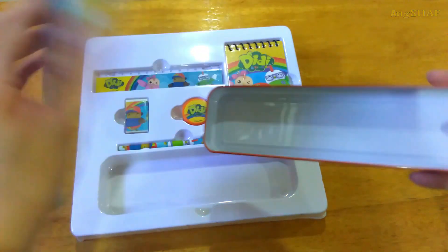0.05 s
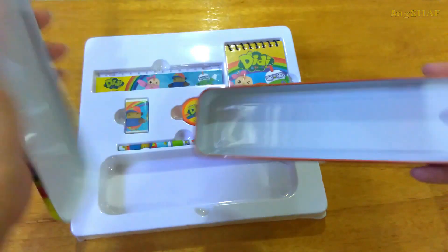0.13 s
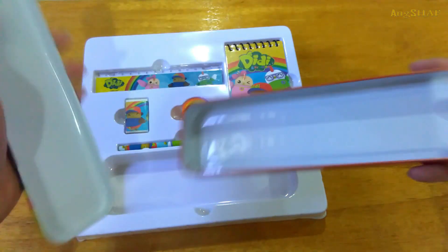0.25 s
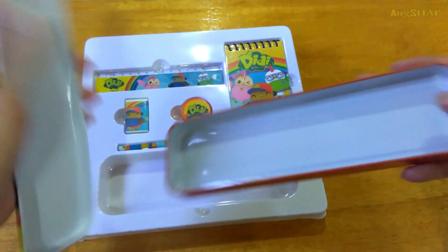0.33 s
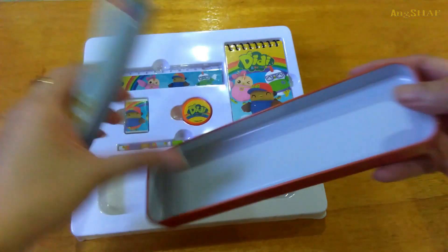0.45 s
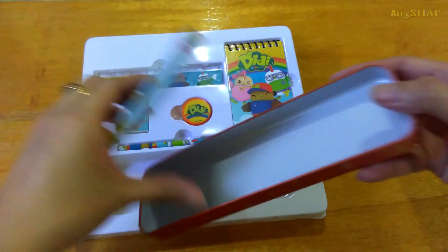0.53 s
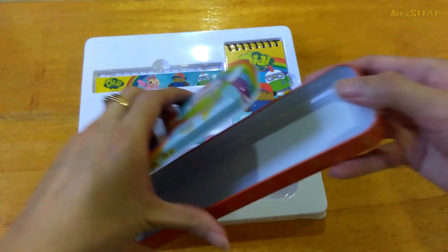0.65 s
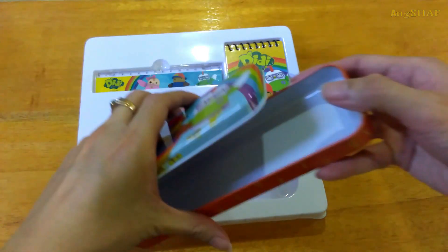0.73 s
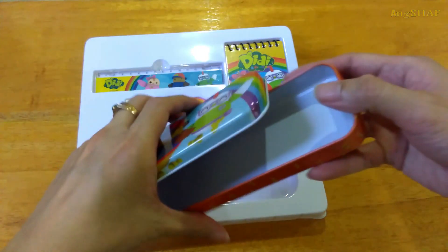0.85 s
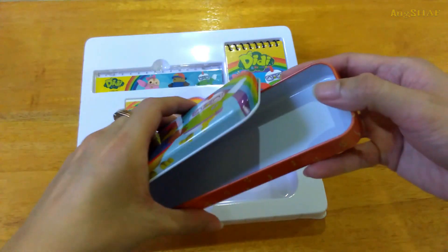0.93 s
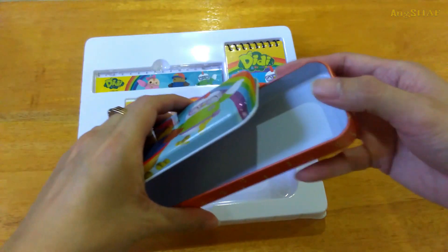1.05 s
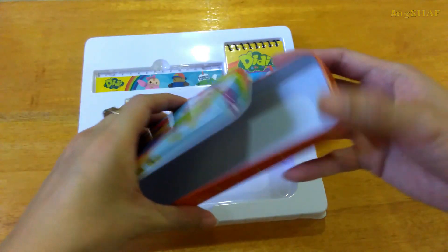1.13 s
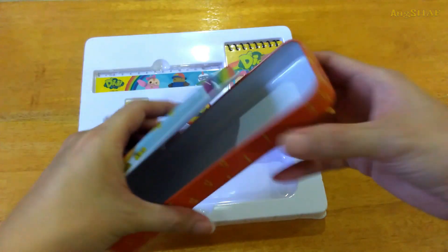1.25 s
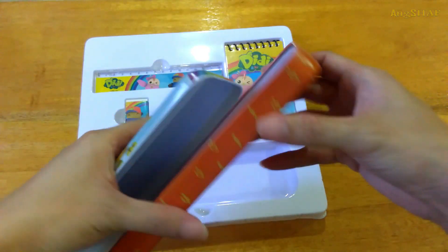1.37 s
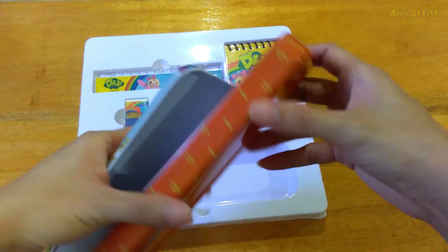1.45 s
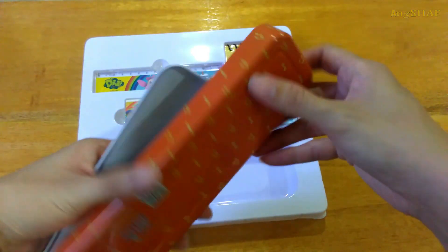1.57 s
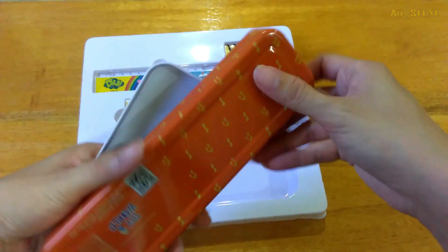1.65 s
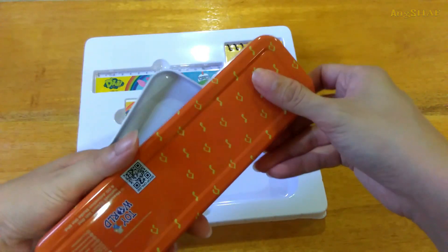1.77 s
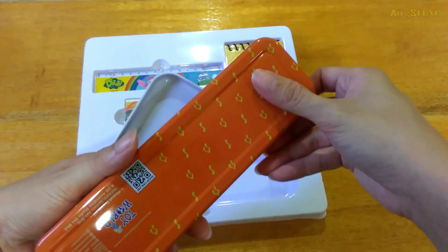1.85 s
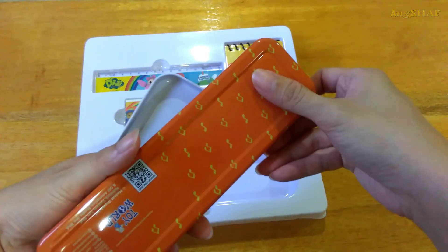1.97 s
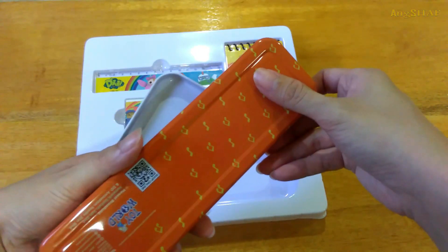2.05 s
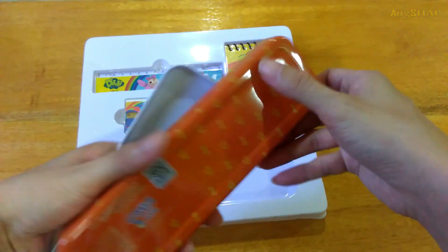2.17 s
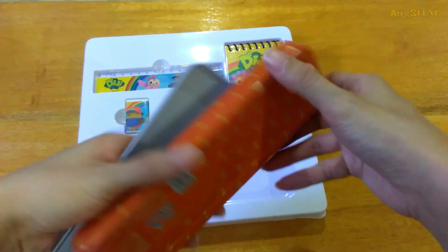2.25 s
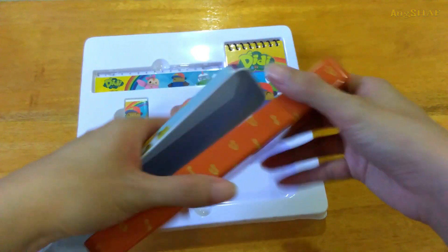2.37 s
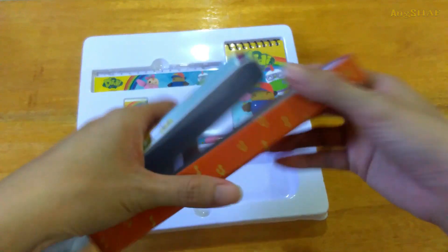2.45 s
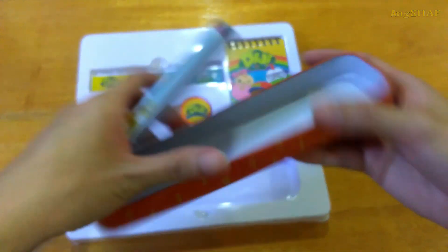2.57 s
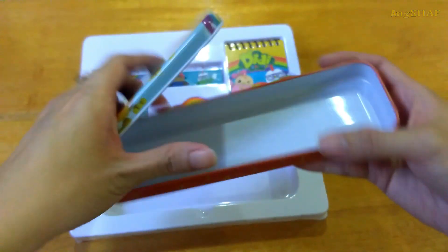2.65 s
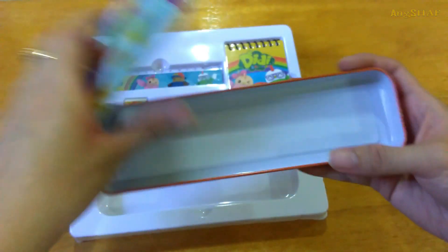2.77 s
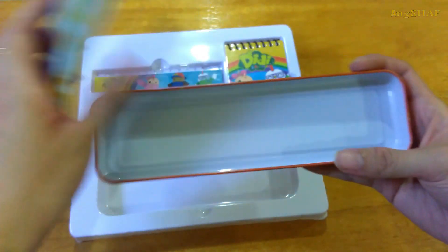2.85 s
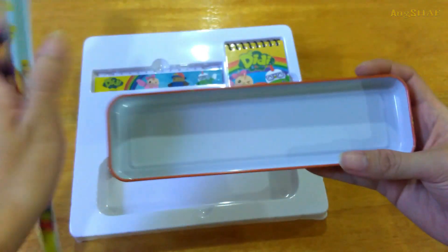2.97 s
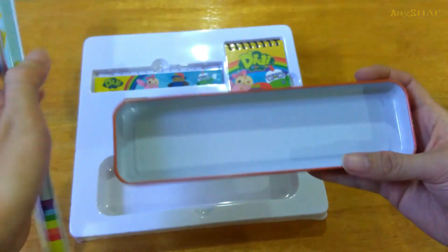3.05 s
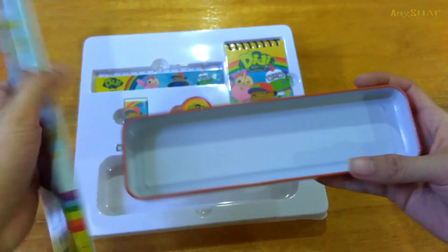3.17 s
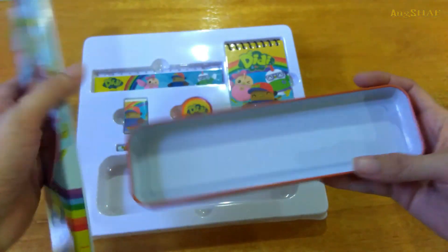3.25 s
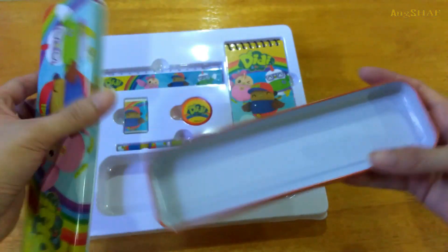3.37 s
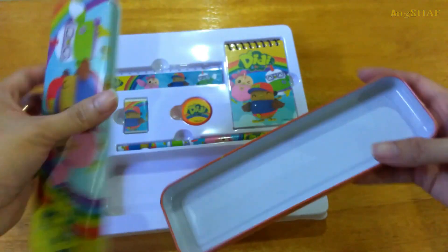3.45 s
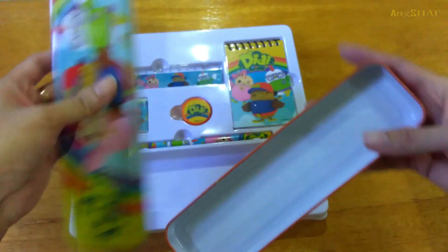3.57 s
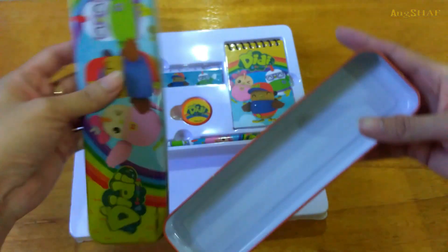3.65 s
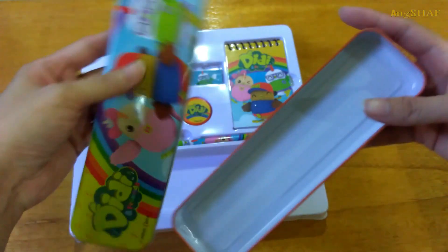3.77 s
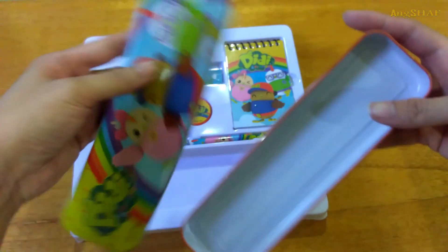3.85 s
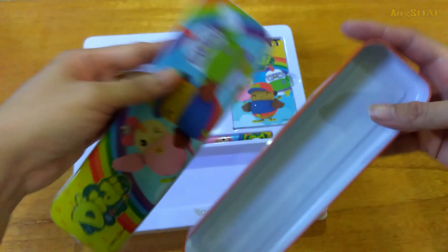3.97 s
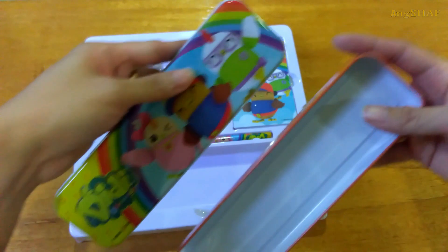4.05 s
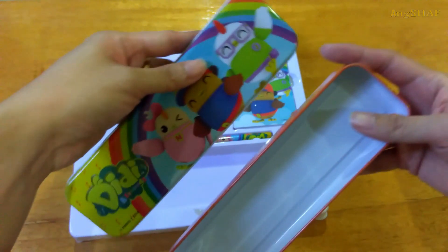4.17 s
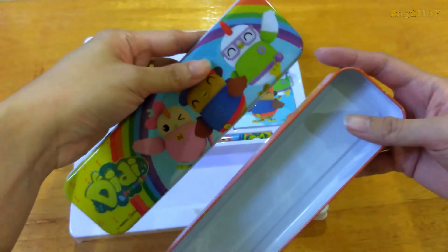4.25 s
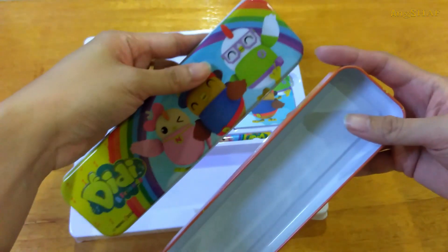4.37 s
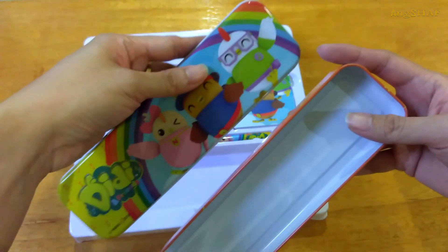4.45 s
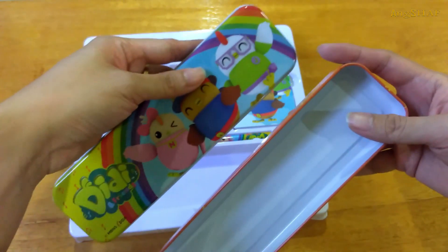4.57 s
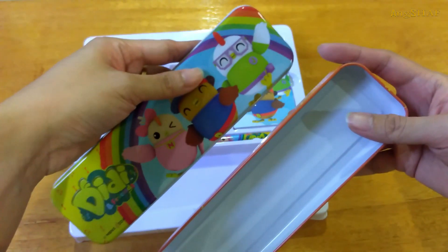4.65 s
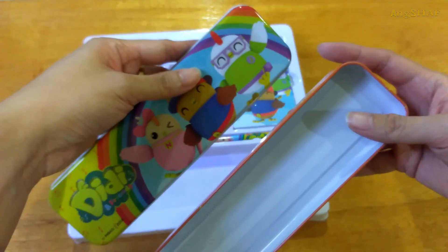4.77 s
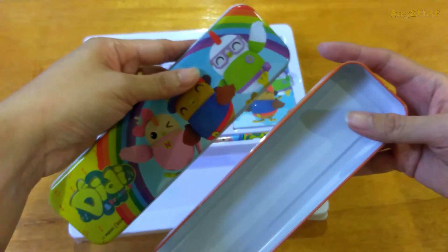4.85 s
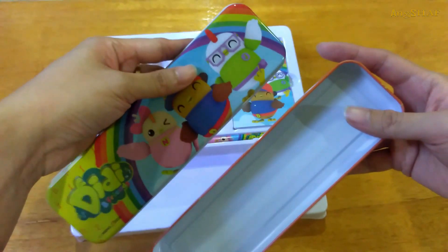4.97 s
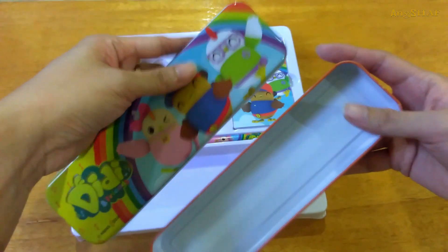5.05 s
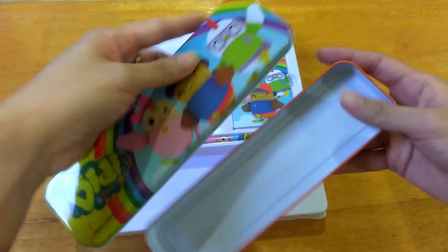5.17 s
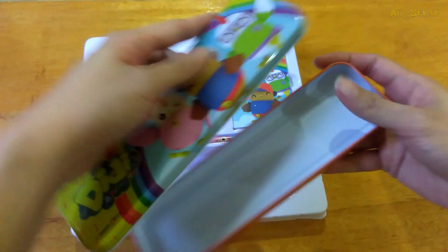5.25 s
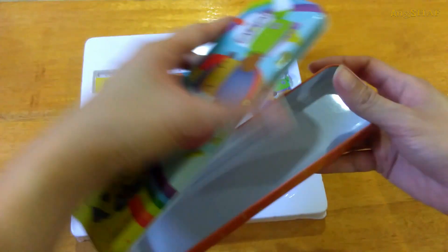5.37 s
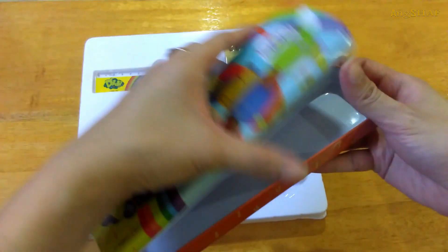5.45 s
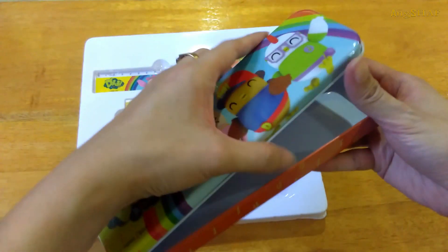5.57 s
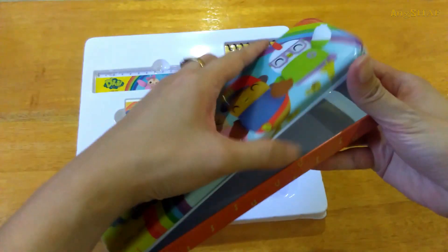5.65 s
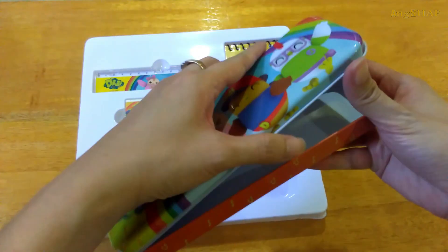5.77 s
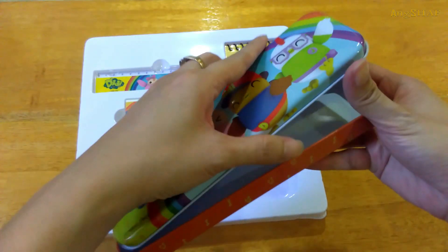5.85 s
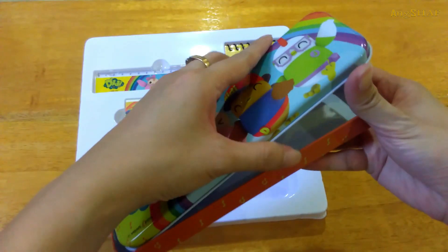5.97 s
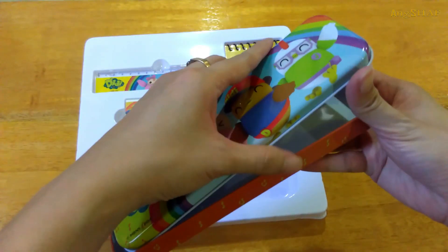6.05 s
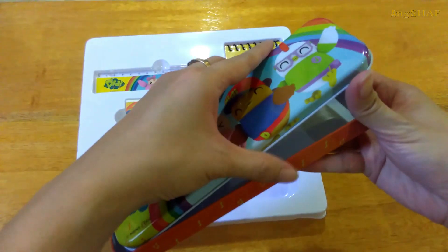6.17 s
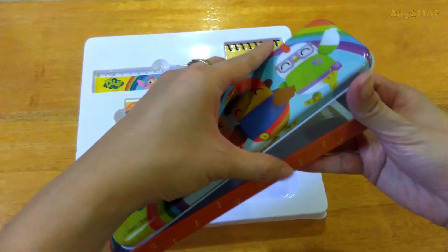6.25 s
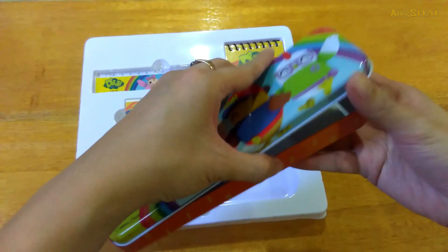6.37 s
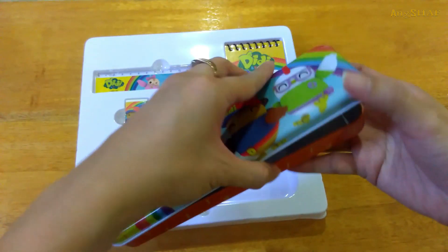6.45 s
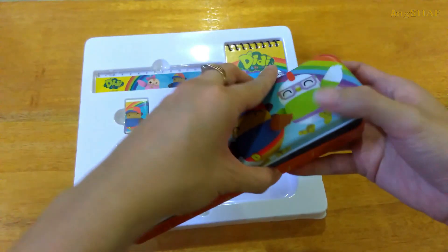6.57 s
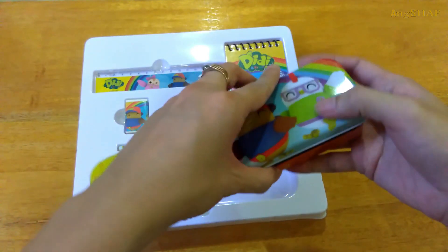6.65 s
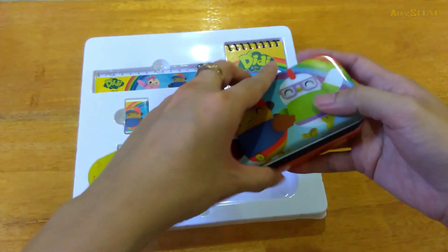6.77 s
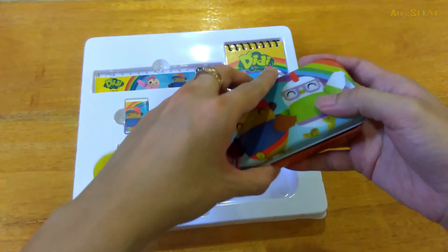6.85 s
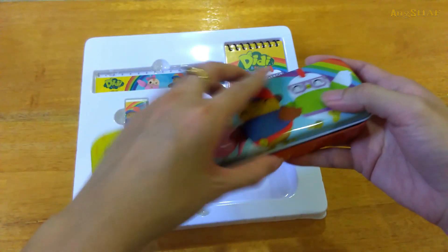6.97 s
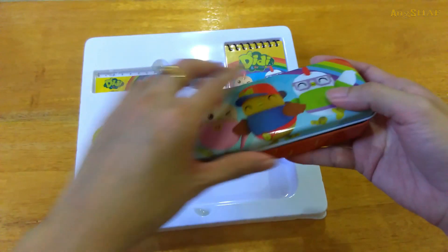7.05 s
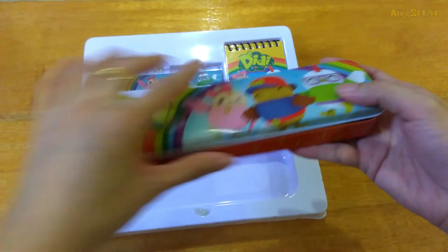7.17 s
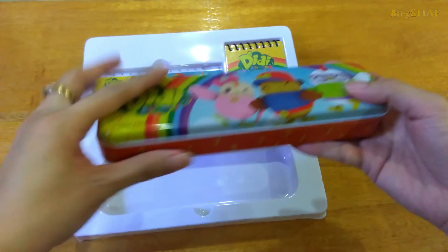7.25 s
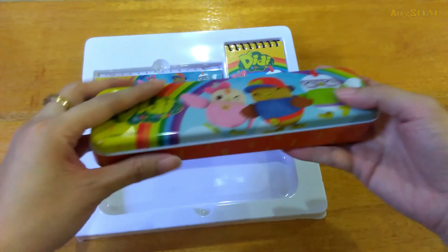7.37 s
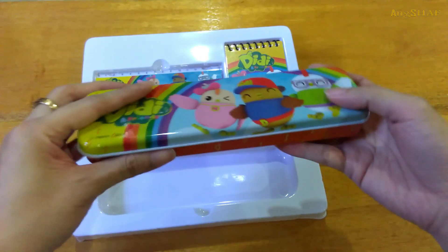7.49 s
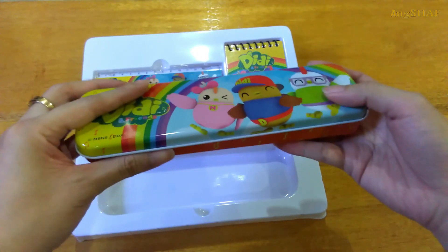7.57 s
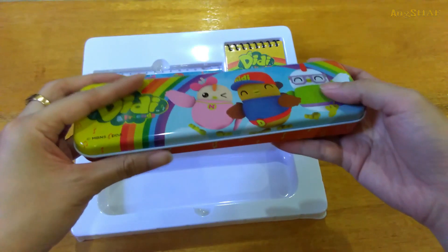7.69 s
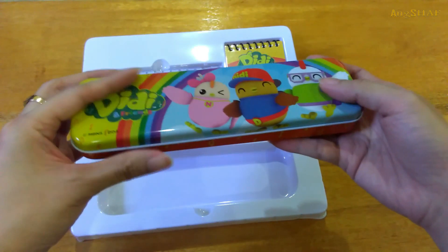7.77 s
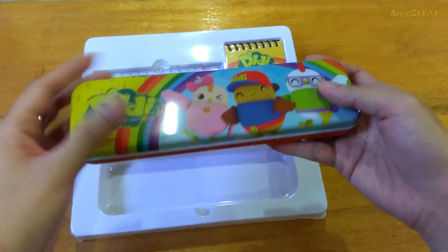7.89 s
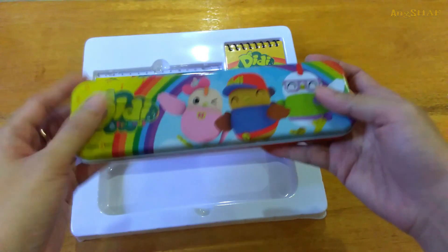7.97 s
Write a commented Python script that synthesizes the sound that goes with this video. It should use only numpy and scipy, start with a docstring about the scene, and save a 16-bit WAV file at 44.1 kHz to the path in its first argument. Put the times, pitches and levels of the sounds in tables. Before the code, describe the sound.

Thin metal lid and base tap softly, later clink and scrape together, squeak briefly and snap closed over low hum and faint hiss.

```python
"""Two hands fit the lid of a tin pencil case onto its base, heard up close in a small, quiet room.
From the start there is a low hum, soft hiss, rustle of hands and faint, short, fuzzy high tones: noise and sines.
Then the halves tap and clink (noise and ringing modes), fingers brush the paint and edges scrape (swells of noise).
Later the rims rub as they slide together (noise through moving resonances).
Last, a thin squeak of sines leads up to the snap of the lid, and a few softer knocks follow."""
import sys
import numpy as np
from scipy import signal
from scipy.fft import rfft, irfft
from scipy.io import wavfile
from scipy.ndimage import uniform_filter1d

SR = 44100
rng = np.random.default_rng(int(sys.argv[2]) if len(sys.argv) > 2 else 0)


def generate_wav(sig):
    """Save sig (samples, or channels by samples) to the path in sys.argv[1] as 16-bit PCM at SR."""
    pcm = np.round(np.clip(np.atleast_2d(sig).T, -1, 1) * 32767).astype(np.int16)
    wavfile.write(sys.argv[1], SR, pcm)


N = 353936
TIME = np.arange(N) / SR  # seconds

# Spectrum of the room's air. Each row: frequency in Hz, relative strength in dB per Hz.
AIR_SPECTRUM = [(24, -36), (40, 5), (52, -16.5), (80, -12.5), (130, -11.5), (300, -11.5), (520, -7),
                (700, -17), (1000, -15), (1500, -41.5), (2500, -26.5), (4300, -32), (6500, -29.5),
                (8500, -25.5), (14000, -32)]
AIR_DB = -75
# How alike left and right are in steady noise. Each row: frequency in Hz, likeness from 0 to 1.
LEFT_RIGHT_LIKENESS = [(30, 0.37), (60, 0.12), (130, 0.32), (400, 0.3), (1500, 0.043), (4000, 0.13)]
# Soft rustle of the moving hands. Each row: time in seconds, level in dB before a small overall trim.
HANDS_LEVEL = [(0, -62), (.9, -63), (1.4, -68), (3.3, -70.5), (4, -66.5), (4.4, -69.5), (6.1, -68),
               (8.02, -67)]
# Spectrum of that rustle. Each row: frequency in Hz, relative strength in dB per Hz.
HANDS_SPECTRUM = [(30, -19), (60, 12.5), (130, 1), (280, 3), (500, -5), (900, -14), (2500, -20.5),
                  (4500, -35), (14000, -58)]
# Tones of the hum. Each row: pitch in Hz, level in dB before the swell, width of the wavering in Hz.
HUM_TONES = [(100.7, -68.5, 2.7), (56.3, -93.5, 3.4), (294.7, -78.5, 20), (461, -82.5, 11),
             (543.3, -79.5, 18), (9400, -101.5, 23)]
# Rise and fall of the hum. Each row: time in seconds, change in dB.
HUM_SWELL = [(0, 1), (.9, -0.5), (1.6, -4), (4.2, -5.5), (6, -3.5)]

# The clearest of the faint, short high tones. Each row: start in seconds, level in dB, middle pitch in Hz.
CLEAR_BLIPS = [(0.153, -76, 2860), (.719, -77.5, 5270), (1.254, -75.5, 7900), (1.48, -77, 7750),
               (2.52, -75, 7640), (2.972, -75, 7900), (3.19, -73, 7800), (6.31, -74.5, 7850),
               (7.359, -73, 8000)]
# Fainter ones come at random, with these averages and spreads.
BLIP_HZ, BLIP_SCATTER_HZ = 7500, 123.6
BLIP_DB, BLIP_SPREAD_DB, BLIPS_PER_S = -86.5, 3, 2.2

# Contacts of tin on tin. Each row: time in seconds, clink level in dB, then thud, body and tick in dB above
# the clink, panel resonance in Hz, its share of the body from 0 to 1, and the time in seconds
# for the ringing to fall 60 dB, as damped by the grip.
KNOCKS = [(1.019, -67.5, -8, -6, -7, 1820, 0.71, 0.13), (1.0919, -41, -13.5, -.5, -6, 1775, 0.6, 0.12),
          (1.344, -70.5, -13, 9.5, -9, 1490, 0.24, 0.12), (1.589, -57.5, -3, 3, -16, 966, 0.12, 0.1),
          (1.8378, -42.5, -11.5, 3.5, -8, 1263, 0.74, 0.13),
          (2.6846, -46.5, -12, -9.5, -6, 2223, 0.15, 0.24), (2.693, -49.5, -19, -6, -6, 420, 0.6, 0.14),
          (2.7582, -58.5, -14, -5.5, -5, 1850, 0.76, 0.15), (3.4624, -48, -28, -14.5, -4, 2060, 0.61, 0.16),
          (3.538, -51, -32, -10, -5.5, 980, 0.39, 0.095), (3.819, -44.5, -8, 5, -9, 2090, 0.2, 0.023),
          (3.827, -39.5, -12.5, 0, -6.5, 1807, 0.54, 0.12), (3.877, -49, -26, -12, -16, 1820, .35, 0.15),
          (5.7056, -57.5, -18, -4, -9.5, 1990, 0.96, 0.35),
          (5.751, -29.5, -21, -9, -11.5, 1980, 0.37, 0.098), (5.8063, -48, -27, -1.5, -19, 2095, 1, .07),
          (5.846, -44, -11.5, 1.5, 0.5, 2005, 0.79, 0.13),
          (5.887, -40.5, -18, -4.5, -7.5, 2036, 0.56, 0.094), (5.933, -55, -28, -1.5, -8, 2073, .35, 0.29),
          (6.026, -33.5, -21, -4.5, -11.5, 2190, 0.33, 0.14),
          (6.0718, -38.5, -13.5, -5, -4, 1717, .45, 0.093), (6.497, -51, -25, 7, -29, 1410, 0.67, 0.18),
          (6.5836, -45, -17, 1.5, -3, 1790, 0.27, 0.19), (6.6, -45.5, -13.5, -7.5, -9, 1110, 0.9, 0.09),
          (6.837, -36.5, -24, -0.5, -4, 1293, 0.49, 0.07),
          (7.0002, -45.5, -24, -0.5, -5, 1850, 0.23, 0.043), (7.01, -52.5, -20, -1, -4, 1850, 0.1, 0.089),
          (7.073, -35.5, -16.5, 4.5, -11, 2132, 0.11, 0.048),
          (7.4292, -27, -17, -2.5, -9, 1094, 0.37, 0.05), (7.461, -52, 0.5, 9.5, -18, 2100, 0.23, 0.095),
          (7.482, -61.5, 8.5, 11, -18, 865, 0.96, 0.3), (7.577, -57.5, -2, 0, -9, 876, 0.22, 0.15),
          (7.67, -34, -8.5, -6.5, -8.5, 1270, 0.3, 0.073), (7.876, -59, -2, 1.5, -8, 946, 0.16, 0.15),
          (7.984, -84.5, 22.5, 13, -4, 1277, 0.68, 0.093)]
# Borders in Hz between the five registers: thud, body, clank, clink and tick.
REGISTER_EDGES_HZ = [150, 750, 2400, 4200, 8000, 15000]
# Modes of the tin. Each row: nominal pitch in Hz, relative level in dB, seconds to fall 60 dB if not cut short.
TIN_MODES = [(422, 6, 0.15), (826, 7, 0.14), (1003, -8, 0.2), (1220, -17.5, 0.037), (1330, -20, 0.12),
             (1860, -7, 0.085), (2010, 7, 0.065), (2875, 2, 0.17), (3190, -17, 0.09), (4600, -6, 0.04),
             (5100, -15.5, .09), (5700, 5, .1), (5940, -12, .1), (6700, -2, .1), (6900, 11.5, 0.086),
             (6730, 0, 0.041), (7760, -6.5, .11), (9500, -12.5, 0.13), (13100, -10.5, .1)]
LONGEST_RING_S = 0.12  # the hands never let one of these modes take longer to fall 60 dB
# Colour of the thin sheet. Each row: frequency in Hz, relative strength in dB per Hz.
SHEET_COLOUR = [(150, -24.5), (400, -15), (650, -9), (1000, 0), (1350, 8.5), (1600, 2), (2150, 3.5),
                (2550, -4.5), (3100, 0.5), (3900, -6.5), (4500, -7.5), (6700, -6.5), (7900, -11),
                (14000, -23)]
CRACK_DB = 1.5  # the first crack, above the ringing sheet
# The clank grows with the body of the blow and with a looser grip.
CLANK_DB, CLANK_PER_BODY = -4.5, 0.54  # dB above the clink, and dB more for each dB of body
CLANK_PER_RING_DB, USUAL_RING_S = 2.5, 0.076  # dB more each time the ring lasts twice as long
RIM_HZ, RIM_SCATTER = 6280, 0.0555  # the stiff rim rings near this pitch, a little different at each spot

# Fingers brushing over the paint. Each row: start in seconds, length in seconds, peak level in dB.
BRUSHES = [(1.45, 0.44, -76.5), (2.48, 0.39, -78), (3.1, 0.95, -80.5), (3.6, 0.27, -77), (4.08, .15, -76),
           (5.27, .24, -71.5)]
# Colour of the brushing. Each row: frequency in Hz, relative strength in dB per Hz.
BRUSH_COLOUR = [(300, -20.5), (1500, 5), (2600, 5), (4000, -4.5), (6500, 5), (9000, 4.5), (14000, -8)]
# Short scrapes of edge on edge. Each row: start in seconds, length in seconds, peak level in dB.
SCRAPES = [(2.62, 0.069, -64.5), (5.765, .06, -50.5), (5.90, .06, -56), (5.955, 0.14, -69),
           (6.48, 0.049, -49), (6.615, 0.056, -52.5), (7.045, 0.043, -51), (7.445, 0.043, -56.5),
           (7.51, 0.095, -54), (7.65, .02, -53.5)]

# Rim sliding along rim. Each row: time in seconds, pressure as a level in dB, low resonance in Hz
# as set by the point of contact, high resonance in dB above the low one.
SLIDE_PATH = [(5.70, -66.5, 440, 4), (5.85, -66.5, 427, 3), (5.99, -75.5, 555, 21), (6.12, -59, 630, -7),
              (6.325, -67, 665, -18), (6.355, -60.5, 870, -7.5), (6.65, -60, 814, 2), (7.0, -64, 818, 7),
              (7.16, -71, 800, 11), (7.27, -67.5, 790, 2), (7.42, -64.5, 690, -14)]
# Multiples of the middle resonance, the first being itself: dB on top of MIDDLE_DB.
SLIDE_OVERTONES_DB = [-2.5, -18, -15, -12, -14.5]
# The middle resonance starts at this pitch and follows the low one by this power.
MIDDLE_HZ, MIDDLE_DB, MIDDLE_FOLLOW = 1355, -0.5, 0.16
HIGH_HZ, HIGH_SAG_HZ_PER_S = 2106, 227  # the high resonance sinks steadily as the lid goes on
PANEL_HZ, PANEL_WIDTH_HZ, PANEL_DB = 1033, 210, -4.5  # the flat of the lid hums along near one pitch

SQUEAK_START_S, SQUEAK_END_S, SQUEAK_RISE_S = 7.195, 7.43, 0.015
SQUEAK_HZ, SQUEAK_DB = 1503, -61.5
# Partials of the squeak from the lowest up: relative level in dB.
SQUEAK_PARTIALS_DB = [0, -30, -24, -32, -28]

# Difference between the two sides. Each row: frequency in Hz, left minus right in dB.
LEFT_MINUS_RIGHT = [(300, 2.5), (1200, -0.5), (1900, 3), (3300, -1.5), (4500, 7), (6400, 11), (7600, 4.5),
                    (9500, 1), (11500, -9), (14000, -5)]
# Stereo width. Each row: frequency in Hz, side (difference) signal minus mid (shared) signal in dB.
STEREO_WIDTH = [(250, -11), (600, -10), (1200, -6), (2200, -2), (4000, 0)]
# Dying of the room's reflections. Each row: frequency in Hz, seconds to fall 60 dB.
ROOM_DECAY = [(200, 0.32), (800, 0.28), (2000, 0.36), (5500, 0.31), (9000, 0.23), (14000, 0.41)]
EDGE_HZ = 14500  # top of the band


def amp(db):
    """Turns decibels into gain."""
    return 10 ** (np.asarray(db) / 20)


def unit(x):
    """Scales a sound to an average strength (rms) of 1."""
    return x / np.sqrt(np.mean(x ** 2) + 1e-24)


def die_away(t, t60):
    """A fade that falls 60 dB in t60 seconds."""
    return np.exp(-np.log(1000) * t / t60)


def read(points, hz):
    """Reads a table between its rows, along a logarithmic frequency axis."""
    f, value = np.transpose(points)
    return np.interp(np.log(hz + 1), np.log(f + 1), value)


def over_time(points):
    """Reads a table of time and level at every sample."""
    return np.interp(TIME, *np.transpose(points))


def add(mix, s, sound):
    """Adds a sound into the mix at s seconds."""
    part = mix[:, round(s * SR):][:, :sound.shape[1]]
    part += sound[:, :part.shape[1]]


def colour(x, points, scale=1, size=2048):
    """Filters with the given dB spectrum, without any sound ahead of its cause (minimum phase)."""
    hz = abs(np.fft.fftfreq(size, 1 / SR))
    log_gain = np.log(amp(scale * read(points, hz)))
    response = np.exp(np.conj(signal.hilbert(log_gain)))
    taps = np.fft.ifft(response).real[:size // 2]
    return signal.oaconvolve(x, taps)[:len(x)]


def left_and_right(pair):
    """Makes two sides from mid and side: most alike in the bass, each with its own colour."""
    mid, side = pair[0], colour(pair[1], STEREO_WIDTH)
    left = colour(mid + side, LEFT_MINUS_RIGHT, 0.5)
    right = colour(mid - side, LEFT_MINUS_RIGHT, -0.5)
    return np.array([left, right])


def resonate(x, hz, width):
    """A steep resonance, width in Hz, that follows the pitch hz."""
    turn = np.exp(2j * np.pi * np.cumsum(hz * np.ones(N)) / SR)
    r = np.exp(-np.pi * width / SR)
    # shift the pitch down to zero, smooth, and shift it back
    return (turn * signal.lfilter([(1 - r) ** 2], [1, -2 * r, r * r], x / turn)).real


def drift(size):
    """Slow random movement of rms 1, smoothed twice over size samples."""
    once = uniform_filter1d(rng.standard_normal(N), size=size)
    return unit(uniform_filter1d(once, size=size))


def hiss(points):
    """Steady stereo noise of the given spectrum, its sides partly alike."""
    hz = np.fft.rfftfreq(N, 1 / SR)
    a, b = rfft(rng.standard_normal((2, N)))
    same = read(LEFT_RIGHT_LIKENESS, hz)
    pair = np.array([a, same * a + np.sqrt(1 - same ** 2) * b])
    return unit(irfft(pair * amp(read(points, hz)), N))


def lumpy(x, patch_db=4.0):
    """Lets patches of the spectrum swell and fade at random."""
    z = signal.stft(x, nperseg=1024)[2]
    patches = uniform_filter1d(rng.standard_normal(z.shape[1:]), size=4, axis=0)  # across frequency
    patches = unit(uniform_filter1d(patches, size=6, axis=1))  # across time
    return unit(signal.istft(z * amp(patch_db * patches), nperseg=1024)[1][:, :N])


def slips(grip_db, size=220):
    """Stereo friction noise that catches and lets go every few milliseconds."""
    grip = unit(uniform_filter1d(rng.standard_normal(N), size=size))
    return rng.standard_normal((2, N)) * amp(grip_db * grip)


def strokes(rows, points, grip_db):
    """Brief swells of uneven noise of one colour; each stroke rises and fades."""
    swell = np.zeros((1, N))
    for s, length, db in rows:
        add(swell, s, amp(db) * signal.windows.cosine(max(int(length * SR), 2))[None])
    return swell * unit(left_and_right([colour(c, points) for c in slips(grip_db)]))


def air():
    """Room air: a soft, slightly patchy hiss with a strong low end."""
    return amp(AIR_DB) * lumpy(hiss(AIR_SPECTRUM), patch_db=-1.0)


def hum(waver=0.2):
    """A wavering hum: each sine has a little narrow noise around its pitch."""
    out = np.zeros(N)
    for hz, db, width in HUM_TONES:
        noise = unit(resonate(rng.standard_normal(N), hz, width))
        out += amp(db) * unit(np.sin(2 * np.pi * hz * TIME) + waver * noise)
    return out * amp(over_time(HUM_SWELL))


def hands(trim_db=-1):
    """Soft rustle of the hands: mostly low, patchy noise that comes and goes."""
    return lumpy(hiss(HANDS_SPECTRUM)) * amp(over_time(HANDS_LEVEL) + trim_db)


def background(lean_db=0.96):
    """Air, hum and hands together; the hum and hands lean left."""
    return air() + (hands() + hum()) * amp([[lean_db], [-lean_db]])


def blips(length_s=0.044, fall=0.016, fuzz=0.045):
    """Faint, short, fuzzy high tones: slightly falling sines with a shaky pitch, at uneven intervals."""
    out, u = np.zeros((2, N)), np.linspace(0, 1, int(length_s * SR))
    rows = list(CLEAR_BLIPS)
    for slot in np.arange(0, N / SR, 1 / BLIPS_PER_S):
        start = slot + rng.random() / BLIPS_PER_S
        rows.append((start, rng.normal(BLIP_DB, BLIP_SPREAD_DB), rng.normal(BLIP_HZ, BLIP_SCATTER_HZ)))
    for s, db, hz in rows:
        waver = fuzz * unit(uniform_filter1d(rng.standard_normal((2, len(u))), size=30))
        pitch = hz * (1 + fall * (0.5 - u) + waver)
        tone = np.sin(2 * np.pi * np.cumsum(pitch, axis=1) / SR)
        add(out, s, amp(db) * unit(tone * np.sqrt(u) * (1 - u)))
    return out


def struck(x):
    """Scales a blow so that its first 20 ms have an rms of 1."""
    return x / np.sqrt(np.mean(x[:, :SR // 50] ** 2) + 1e-24)


def standing_modes(t, modes_db=-21):
    """The few modes of the tin that stand out, a little different at each blow."""
    out = np.zeros((2, len(t)))
    for hz, db, life in TIN_MODES:
        gain = amp(db + modes_db) * rng.uniform(0.83, 1, (2, 1))
        pitch = hz * rng.normal(1, 0.0048)
        ring = np.sin(2 * np.pi * (pitch * t + rng.random((2, 1))))
        out += gain * ring * die_away(t, min(life, LONGEST_RING_S))
    return out


def crowded_modes(t, t60, spacing_hz=42):
    """The many close modes of a thin sheet: noise kept at random frequencies only, dying away."""
    size = len(t)
    bins = np.fft.rfftfreq(size, 1 / SR)
    # each blow wakes its own set, spaced more widely in the treble
    excited = rng.random(len(bins)) < bins[1] / (spacing_hz * np.clip(bins / 4000, 0.3, 3))
    return unit(irfft(rfft(rng.standard_normal((2, size))) * excited, size)) * die_away(t, t60)


def beating_pair(t, hz, t60):
    """A strong resonance: two close pitches that beat against each other."""
    phase = np.array([[0], [np.pi / 2]])  # the side signal is a quarter turn off the mid
    pair = np.sin(2 * np.pi * hz * 0.98 * t + phase) + 0.68 * np.sin(2 * np.pi * hz * 1.025 * t + phase)
    soft_start = 1 - np.exp(-t * hz)
    return struck(left_and_right(pair * die_away(t, t60) * soft_start))


def knock(clink_db, thud_db, body_db, tick_db, panel_hz, panel_share, t60,
          crack_s=0.0058, panel_t60=0.051, rim_t60=0.039, rim_share=0.2,
          rebounds_per_s=260, rebound_db=13, rebound_s=0.0093,
          damping=(1.3, 1.05, 1, 1, 0.75), size=11000):
    """A sharp crack sets the thin sheet ringing; five registers are then levelled one by one."""
    t = np.arange(size) / SR
    clank_db = CLANK_DB + CLANK_PER_BODY * body_db + CLANK_PER_RING_DB * np.log2(t60 / USUAL_RING_S)
    rim_hz = RIM_HZ * (1 + RIM_SCATTER * rng.uniform(-1.1, 1))
    crack = rng.standard_normal((2, size)) * amp(CRACK_DB) * np.exp(-t / crack_s)
    # the loose edge chatters: sparse random clicks that fade
    clicks = rng.standard_normal((2, size)) * (rng.random(size) < rebounds_per_s / SR)
    rebounds = clicks * amp(rebound_db) * np.exp(-t / rebound_s)
    blow = crack + rebounds + crowded_modes(t, t60) + standing_modes(t)
    sheet = left_and_right([colour(c, SHEET_COLOUR) for c in blow])

    # the panel colours the body (register 1), the rim the clink (register 3)
    strong = {1: (panel_hz, panel_t60, panel_share), 3: (rim_hz, rim_t60, rim_share)}
    out = np.zeros((2, size))
    for k, db in enumerate([thud_db, body_db, clank_db, 0, tick_db]):
        bandpass = signal.butter(3, REGISTER_EDGES_HZ[k:k + 2], "band", fs=SR, output="sos")
        band = signal.sosfilt(bandpass, sheet)
        # damping below 1 dies sooner (the treble), above 1 later (the bass)
        band = struck(band * die_away(t, max(t60, 0.1)) ** (1 / damping[k] - 1))
        if k in strong:
            hz, life, share = strong[k]
            band = np.sqrt(1 - share) * band + np.sqrt(share) * beating_pair(t, hz, life)
        out += amp(clink_db + db) * band
    return out


def knocks(lead_in_db=-50, lead_in_per_clink=0.35, lead_in_s=0.0075):
    """Every tap, clink and snap; a very short, faint swell of noise leads in, stronger for louder ones."""
    out = np.zeros((2, N))
    lead_ins = []
    for s, clink_db, *rest in KNOCKS:
        add(out, s, knock(clink_db, *rest))
        lead_ins.append((s - lead_in_s, lead_in_s, lead_in_db + lead_in_per_clink * clink_db))
    return out + strokes(lead_ins, SHEET_COLOUR, grip_db=-5.5)


def brushes():
    """Fingers brush over the paint: soft swells of uneven friction noise."""
    return strokes(BRUSHES, BRUSH_COLOUR, grip_db=2.5)


def scrapes():
    """Edge scrapes on edge: short swells of friction noise with the colour of the sheet."""
    return strokes(SCRAPES, SHEET_COLOUR, grip_db=3.5)


def slide(low_width=125, middle_width=150, high_width=125, overtone_width=480, wander=0.0039, patchy_db=3.2):
    """Rubbing rims, as noise, excite resonances (widths in Hz); three move with the contact or with time."""
    start_s, end_s = SLIDE_PATH[0][0], SLIDE_PATH[-1][0]
    times, *columns = np.transpose(SLIDE_PATH)
    pressure_db, low, high_db = (np.interp(TIME, times, c) for c in columns)
    middle = MIDDLE_HZ * (low / low[0]) ** MIDDLE_FOLLOW
    high = HIGH_HZ - HIGH_SAG_HZ_PER_S * (TIME - start_s)
    rub = left_and_right(rng.standard_normal((2, N)))

    def voice(hz, db, width):
        """The hand is never steady: each resonance wanders, swells and fades by itself."""
        ringing = resonate(rub, hz * (1 + wander * drift(size=1800)), width)
        return amp(db) * unit(ringing * amp(patchy_db * drift(size=1800)))

    out = voice(low, 0, low_width) + voice(high, high_db, high_width)
    out += voice(PANEL_HZ, PANEL_DB, PANEL_WIDTH_HZ)
    for k, db in enumerate(SLIDE_OVERTONES_DB):
        width = overtone_width if k else middle_width
        out += voice(middle * (k + 1), MIDDLE_DB + db, width)
    return out * amp(pressure_db) * (TIME > start_s) * (TIME < end_s)


def squeak(jitter=0.0032):
    """Just before the lid seats, the slips lock into a thin tone that swells and holds until the snap."""
    waver = 1 + jitter * unit(uniform_filter1d(rng.standard_normal(N), size=120))
    turns = np.cumsum(SQUEAK_HZ * waver) / SR
    tone = np.zeros(N)
    for k, db in enumerate(SQUEAK_PARTIALS_DB):
        tone += amp(db) * np.sin(2 * np.pi * (k + 1) * turns)
    swell = np.clip((TIME - SQUEAK_START_S) / SQUEAK_RISE_S, 0, 1) ** 2 * (TIME < SQUEAK_END_S)
    return amp(SQUEAK_DB) * unit(tone) * swell


def room(x, wet_db=-10, build_s=0.004, size=26000):
    """Dense reflections of a small room: random taps, each band dying at its own speed."""
    taps = rng.standard_normal((2, size)) * (rng.random((2, size)) < 0.12)
    hz, t, z = signal.stft(taps, SR, nperseg=256)
    tail = signal.istft(z * die_away(t, read(ROOM_DECAY, hz)[:, None]), SR, nperseg=256)[1]
    tail *= 1 - np.exp(-(np.arange(tail.shape[1]) / SR / build_s) ** 2)  # reflections build up first
    side = colour(tail[1], STEREO_WIDTH)
    tail = np.array([tail[0] + side, tail[0] - side])
    return amp(wet_db) * signal.oaconvolve(x, tail / np.linalg.norm(tail[0]), axes=1)[:, :N]


def scene():
    """The tin and its reflections in the room, over the background and the faint high tones."""
    tin = knocks() + brushes() + scrapes() + slide() + squeak()
    return background() + blips() + tin + room(tin)


def record(dry):
    """Limits the band: a steep filter takes away the treble above EDGE_HZ."""
    lowpass = signal.firwin(151, EDGE_HZ, window=("kaiser", 8), fs=SR)
    return signal.oaconvolve(dry, lowpass[None], "same")


dry = scene()
out = record(dry)
generate_wav(out)
```